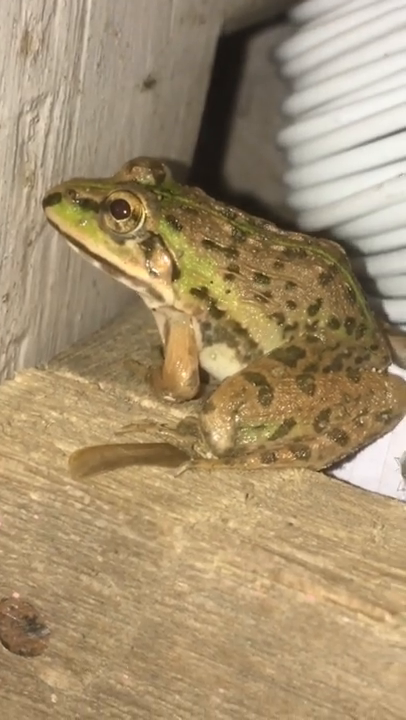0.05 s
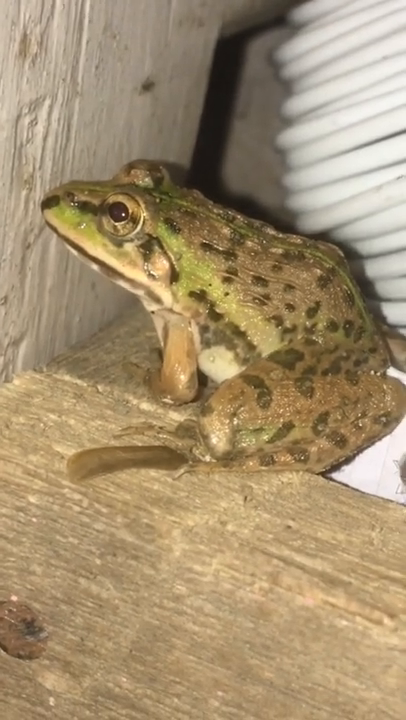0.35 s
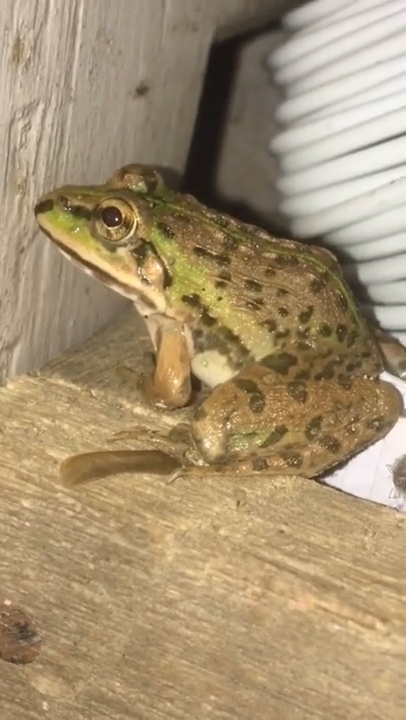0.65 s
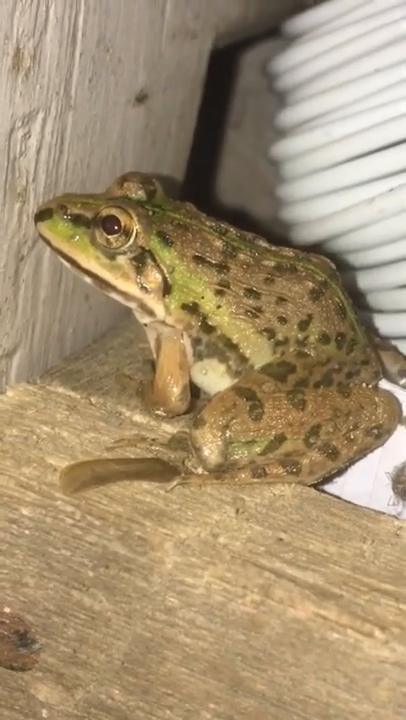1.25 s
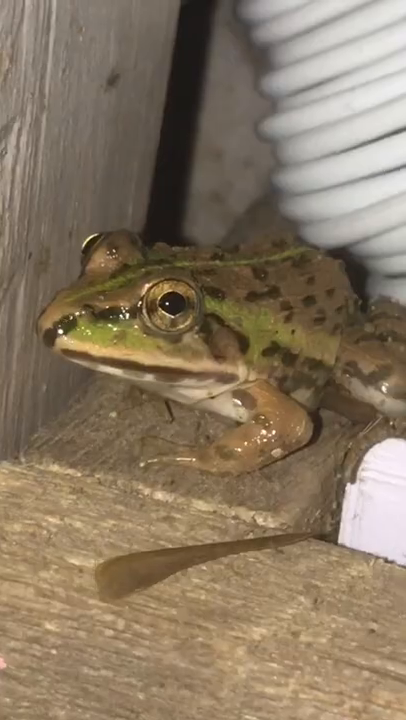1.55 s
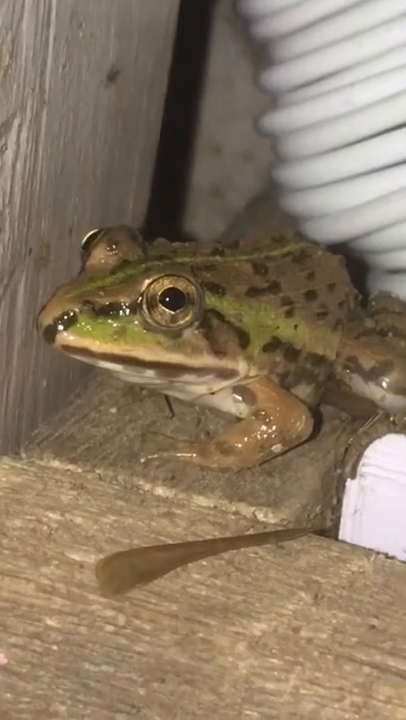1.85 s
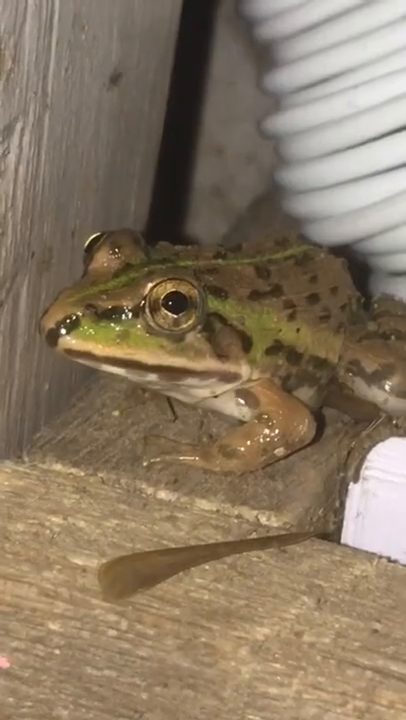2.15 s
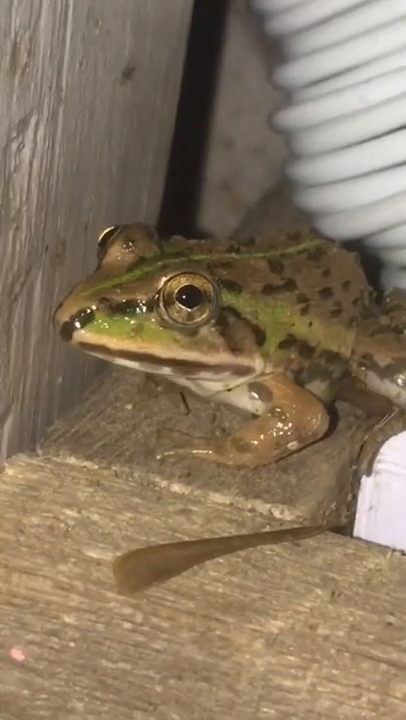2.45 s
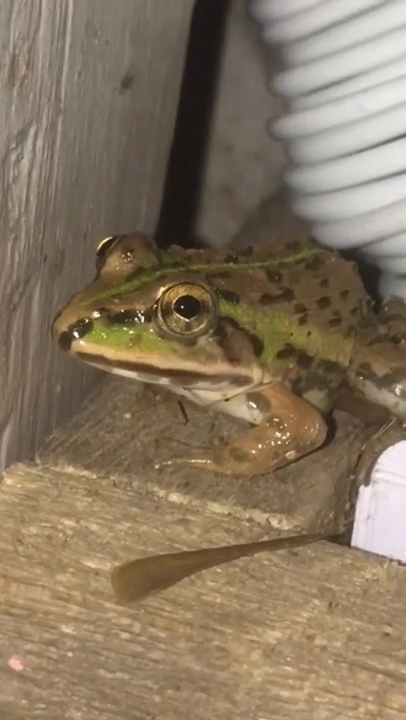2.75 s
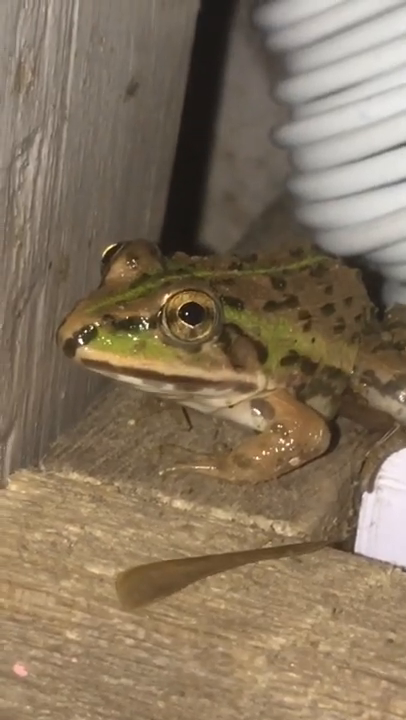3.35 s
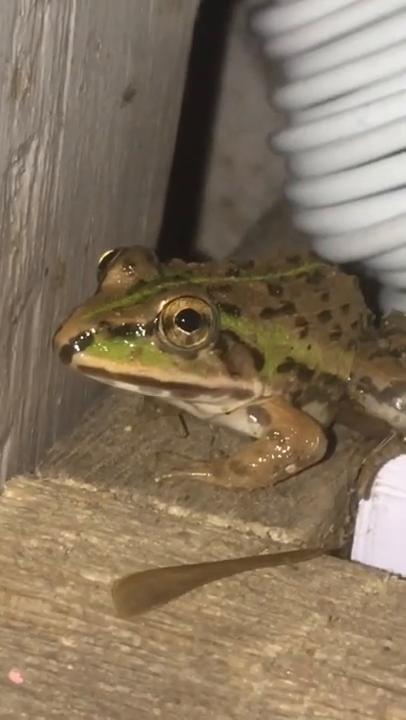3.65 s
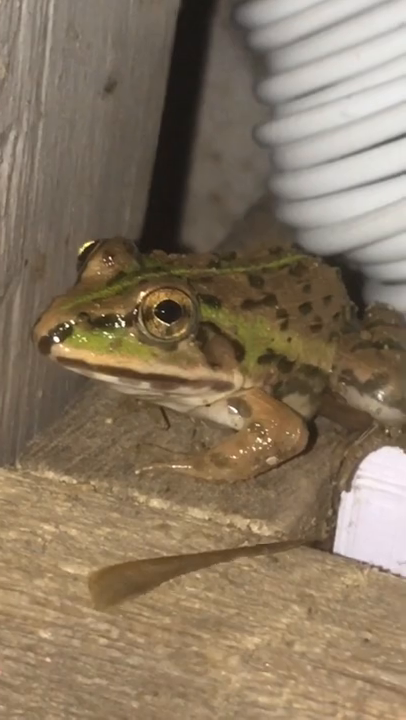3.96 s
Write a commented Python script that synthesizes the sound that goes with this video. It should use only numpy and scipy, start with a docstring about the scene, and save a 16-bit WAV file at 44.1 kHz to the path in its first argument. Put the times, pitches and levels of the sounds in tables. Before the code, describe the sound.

A motor hums and rumbles steadily nearby over an even rush of air. The hand-held microphone picks up soft bumps, the hiss steps up slightly, and two low rubs with rustling come before a light brush at the end.

```python
"""A motor hums and rumbles steadily somewhere near a silent frog, over an even rush of air.
The hum is one strong tone with weak partials; rumble, air and hiss are bands of noise.
The rush abruptly changes colour and the hiss steps up as the viewpoint changes.
The microphone, on a hand-held camera, takes soft bumps and two low rubs of handling or clothing.
A thin whine stops early, rustles swell, a high squeak passes and something brushes by up close."""
import sys
import numpy as np
from scipy import signal
from scipy.fft import rfft, irfft
from scipy.io import wavfile
from scipy.ndimage import uniform_filter1d

SR = 44100
rng = np.random.default_rng(int(sys.argv[2]) if len(sys.argv) > 2 else 0)


def int16_out(signal):
    """Quantize to a 16-bit WAV file."""
    q = np.round(np.clip(np.atleast_2d(signal).T, -1, 1) * 32767)
    wavfile.write(sys.argv[1], SR, q.astype(np.int16))


N = 176400
TIME = np.arange(N) / SR
FREQS = np.fft.rfftfreq(N, 1 / SR)


def amp(db):
    """Decibels to gain."""
    return 10 ** (np.asarray(db) / 20)

def unit(x):
    """Scales to an rms of one."""
    return x / np.sqrt(np.mean(x ** 2) + 1e-20)

def curve(points):
    """Joins (time, value) rows by straight lines."""
    return np.interp(TIME, *np.transpose(points))

def swell(peak_s, half_s):
    """A bell-shaped rise and fall around a moment."""
    return np.exp(-.5 * ((TIME - peak_s) / half_s) ** 2)

def noise(spectrum):
    """Steady noise of unit rms, shaped by (frequency, level) rows."""
    hz, db = np.transpose(spectrum)
    gain = amp(np.interp(np.log(FREQS + 1), np.log(hz + 1), db))
    return unit(irfft(np.exp(2j * np.pi * rng.random(len(FREQS))) * gain, N))

def drift(rate_hz):
    """Smooth random motion up to about the given rate."""
    return unit(irfft(rfft(rng.standard_normal(N)) * np.exp(-(FREQS / rate_hz) ** 2), N))

def ring(hz, width_hz):
    """Noise through one resonance."""
    gain = 1 / (1 + (2 * (FREQS - hz) / width_hz) ** 2)
    return unit(irfft(rfft(rng.standard_normal(N)) * gain, N))

def rings(table):
    """Noise through a set of resonances."""
    return sum(amp(db) * ring(hz, width) for hz, width, db in table)

def viewpoint_switch(at_s=1.38, length_s=.03):
    """Goes abruptly from 0 to 1 as the viewpoint changes."""
    return np.clip(.5 + (TIME - at_s) / length_s, 0, 1)


# The motor's main tone at the microphone (time [s], level [dB])
HUM_LEVEL = [(0, -46), (.06, -32), (.28, -37.5), (.36, -33), (.49, -35.5), (.58, -45.5), (.63, -35.5),
             (.72, -33), (.92, -34), (1.45, -36), (2.0, -34), (2.15, -46.5), (2.32, -49), (2.47, -33),
             (2.92, -37), (3.0, -31.5), (3.45, -37.5), (3.66, -42), (3.81, -33), (3.94, -50.5), (4, -34)]
# Partials of the hum (multiple of the pitch [ratio], relative level [dB])
HUM_PARTIALS = [(.5, -9), (.64, -8.5), (1, 0), (1.998, -23.5), (3, -30)]

def motor_hum(pitch_hz=99.7):
    """A running motor: one strong tone with weak partials, wavering slightly."""
    turns = np.cumsum(pitch_hz + .28 * drift(rate_hz=3.2)) / SR
    tone = sum(amp(db) * np.sin(2 * np.pi * (k * turns + rng.random())) for k, db in HUM_PARTIALS)
    return np.sqrt(2) * tone * amp(curve(HUM_LEVEL) + .42 * drift(rate_hz=16))


# The motor's rumble at the microphone (time [s], level [dB])
RUMBLE_LEVEL = [(0, -37.5), (.08, -39), (.25, -36.5), (.52, -36.5), (.59, -54), (.69, -35.5), (1.0, -40.5),
                (1.2, -46.5), (1.29, -36.5), (1.6, -45.5), (2.0, -37), (2.29, -44.5), (2.5, -41),
                (2.9, -40), (3.04, -34.5), (3.68, -40.5), (3.84, -41.5), (3.97, -39.5)]
# Spectrum of the rumble (frequency [Hz], relative level [dB])
RUMBLE_SPECTRUM = [(15, -52), (28, -9), (42, -5.5), (55, 1), (85, -5), (115, -3.5), (140, -10.5),
                   (170, -16.5), (260, -38), (500, -61.5)]

def motor_rumble():
    """Deep, even noise under the hum that swells and sinks."""
    deep = noise(RUMBLE_SPECTRUM)
    even = deep / np.sqrt(uniform_filter1d(deep ** 2, size=4000) + 1e-6)
    return unit(even) * amp(curve(RUMBLE_LEVEL))


# The air around the microphone (frequency [Hz], relative level [dB])
AIR_SPECTRUM = [(30, -27), (120, 4.5), (170, 3), (200, 5), (255, 2.5), (305, 3.5), (338, 0), (358, 4.5),
                (430, -0.5), (560, -4.5), (690, 1), (790, 0.5), (1090, -3), (1400, -1), (2000, -5),
                (2560, -6), (3200, -13.5), (3600, -14), (4900, -28.5), (16000, -43)]
# Resonances heard throughout (frequency [Hz], width [Hz], level [dB])
STEADY_RINGS = [(358.4, 23, -62), (853.5, 24, -58), (890, 100, -55), (9700, 33, -74), (11400, 25, -89)]
# Resonances at the first viewpoint (frequency [Hz], width [Hz], level [dB])
FIRST_RINGS = [(1655, 120, -64), (2590, 160, -62), (2576, 8.4, -68), (3050, 180, -64)]
# Resonances at the second viewpoint (frequency [Hz], width [Hz], level [dB])
SECOND_RINGS = [(1394, 250, -57), (2290, 1100, -58), (2815, 110, -67), (3470, 260, -68), (4270, 160, -84)]

def air(level_db=-45, patchy_db=1.35):
    """A slightly patchy rush with resonances; its colour changes abruptly with the viewpoint."""
    frames = dict(nperseg=1024, noverlap=768)
    bands = signal.stft(noise(AIR_SPECTRUM), **frames)[2]
    patches = uniform_filter1d(rng.standard_normal(bands.shape), size=10, axis=0)  # across frequency
    patches = unit(uniform_filter1d(patches, size=20, axis=1))  # across time
    rush = signal.istft(bands * amp(patchy_db * patches), **frames)[1][:N]
    switch = viewpoint_switch()
    shifting = np.sqrt(1 - switch) * rings(FIRST_RINGS) + np.sqrt(switch) * rings(SECOND_RINGS)
    return amp(level_db) * unit(rush) + rings(STEADY_RINGS) + shifting


# Background hiss (frequency [Hz], relative level [dB])
HISS_SPECTRUM = [(1000, -24), (3000, -4), (4300, 5.5), (4880, 1), (5300, 5.5), (6450, 6), (7400, 2),
                 (8100, -3.5), (8800, -1), (9600, 5.5), (10050, 5), (10400, 2), (10850, 7), (12100, -3),
                 (16000, -3.5)]
# Extra hiss at the second viewpoint (frequency [Hz], relative level [dB])
EXTRA_HISS_SPECTRUM = [(20, -30), (2000, -15), (5000, -3), (8000, -2), (11500, 0), (15500, 1)]

def hiss(steady_db=-56.5, extra_db=-64.5):
    """Faint treble noise that steps up as the viewpoint changes."""
    steady = amp(steady_db) * noise(HISS_SPECTRUM)
    return steady + amp(extra_db) * viewpoint_switch() * noise(EXTRA_HISS_SPECTRUM)


# A thin whine, faint at the microphone (time [s], level [dB])
WHINE_LEVEL = [(0, -69), (.3, -68), (.55, -64.5), (.74, -62), (.8, -85), (1.0, -100)]

def whine(pitch_hz=3914, wander_hz=3.7, flutter_db=1.8, third_db=-21):
    """A fluttering tone with its third harmonic, fading out within the first second."""
    phase = 2 * np.pi * np.cumsum(pitch_hz + wander_hz * drift(rate_hz=30)) / SR
    tone = np.sin(phase) + amp(third_db) * np.sin(3 * phase)
    return np.sqrt(2) * tone * amp(curve(WHINE_LEVEL) + flutter_db * drift(rate_hz=49))


# Bumps on the camera, right at the microphone (time [s], peak level [dB], final pitch [Hz])
BUMPS = [(.056, -22.5, 74.6), (.515, -23, 54), (1.416, -29, 203), (1.432, -23, 141), (1.491, -22, 97),
         (2.138, -26, 56), (2.471, -28, 82), (2.742, -27, 83), (2.99, -28, 94), (3.454, -23.5, 171),
         (3.464, -26, 116), (3.557, -25.5, 82.4), (3.794, -28.5, 69.5), (3.826, -25.5, 49),
         (3.89, -53, 113)]

def handling_bumps(rise_cycles=.77, drop_cycles=.77, sharp_by=.44):
    """Dull knocks of two or three cycles that start sharp and fall to their pitch."""
    knocks = np.zeros(N)
    for start, db, hz in BUMPS:
        cycles = np.maximum(TIME - start, 0) * hz
        rise = cycles / rise_cycles
        envelope = (rise * np.exp(1 - rise)) ** 2
        turns = cycles + sharp_by * drop_cycles * (1 - np.exp(-cycles / drop_cycles))
        knocks += amp(db) * envelope * np.sin(2 * np.pi * turns)
    return knocks


# Rustles reaching the microphone (peak time [s], half length [s], level [dB])
RUSTLES = [(.45, .04, -63), (1.903, 0.32, -53.5), (3.114, 0.14, -52.5)]
# Spectrum of the rustle (frequency [Hz], relative level [dB])
RUSTLE_SPECTRUM = [(60, -19), (130, 24), (200, -3), (280, 1), (600, 27), (3000, 20), (5000, 10.5),
                   (6500, 17.5), (8400, 11.5), (10500, 13), (13000, 13), (16000, 7)]

def rustles(rough_db=.8):
    """Soft, uneven noise that swells over the hiss."""
    envelope = sum(amp(db) * swell(peak, half) for peak, half, db in RUSTLES)
    return envelope * amp(rough_db * drift(rate_hz=40)) * noise(RUSTLE_SPECTRUM)


# Low rubs at the microphone (peak time [s], half length [s], frequency [Hz], level [dB])
LOW_RUBS = [(1.973, .16, 159, -45), (3.163, 0.12, 198, -45.5)]

def low_rubs(width_hz=44):
    """Two soft, low rubs of handling or clothing under the rustles."""
    return sum(amp(db) * swell(peak, half) * ring(hz, width_hz) for peak, half, hz, db in LOW_RUBS)


# Bands of a squeak, barely heard at the microphone (frequency [Hz], level [dB])
SQUEAK_BANDS = [(13566, -73), (14530, -69), (14772, -69)]

def squeak():
    """Very high, narrow bands of noise flicker briefly."""
    bands = sum(amp(db) * ring(hz, width_hz=14) for hz, db in SQUEAK_BANDS)
    return swell(peak_s=3.16, half_s=.15) * bands


# Brushes close to the microphone (peak time [s], half length [s], level [dB])
BRUSHES = [(3.81, 0.032, -50.5), (3.91, 0.044, -55.5)]
# Spectrum of a brush (frequency [Hz], relative level [dB])
BRUSH_SPECTRUM = [(20, -30), (1500, -12), (4500, -3), (7000, -4), (11000, -4), (15500, -1)]

def brushes():
    """Something brushes lightly past in two short puffs of bright noise."""
    return noise(BRUSH_SPECTRUM) * sum(amp(db) * swell(peak, half) for peak, half, db in BRUSHES)


def scene():
    """All sources at one hand-held microphone."""
    background = motor_hum() + motor_rumble() + air() + hiss()
    events = whine() + handling_bumps() + rustles() + low_rubs() + squeak() + brushes()
    return (background + events)[None]

def record(dry):
    """The microphone rolls off the bass below 25 Hz and cuts the treble above 15750 Hz."""
    bass_cut = signal.butter(2, 25, "high", fs=SR, output="sos")
    treble_cut = signal.firwin(1023, 15750, window=("kaiser", 9), fs=SR)
    return signal.oaconvolve(signal.sosfilt(bass_cut, dry), treble_cut[None], "same")


dry = scene()
out = record(dry)
int16_out(out)
```